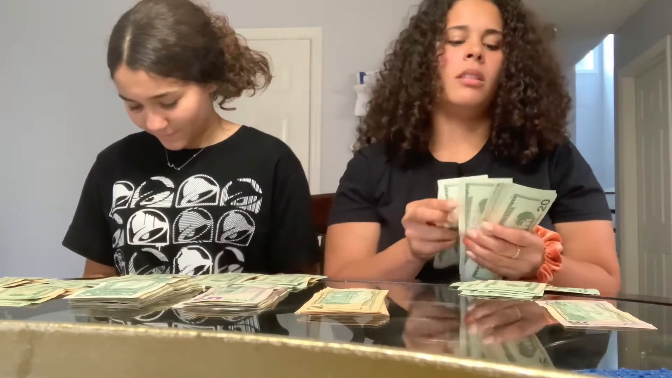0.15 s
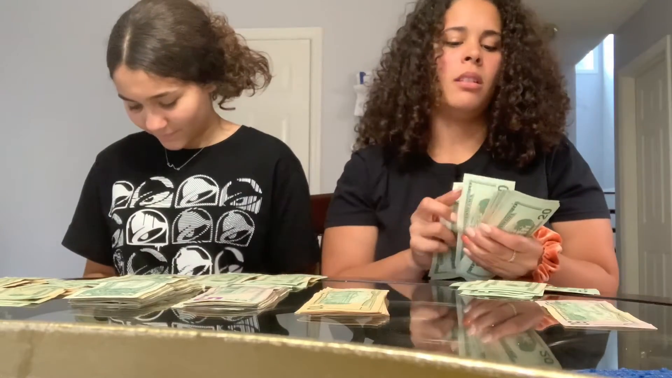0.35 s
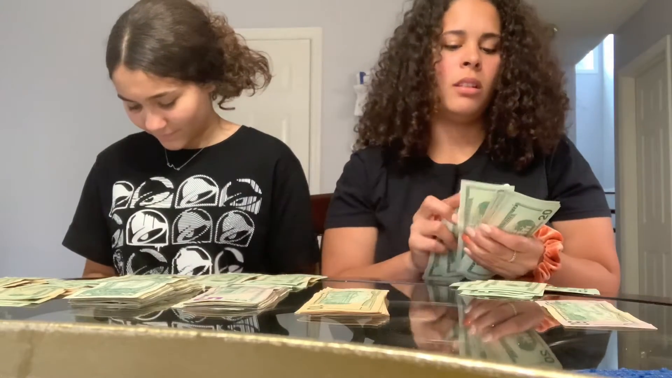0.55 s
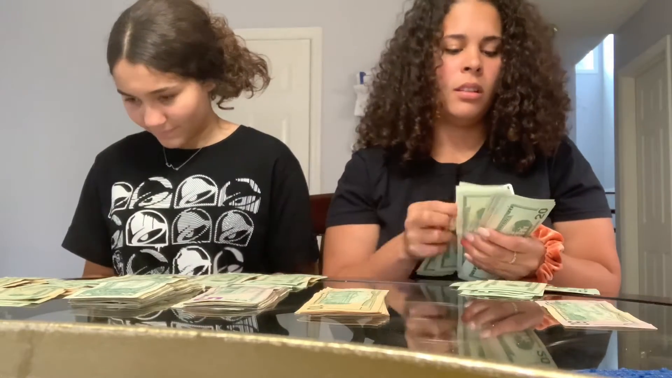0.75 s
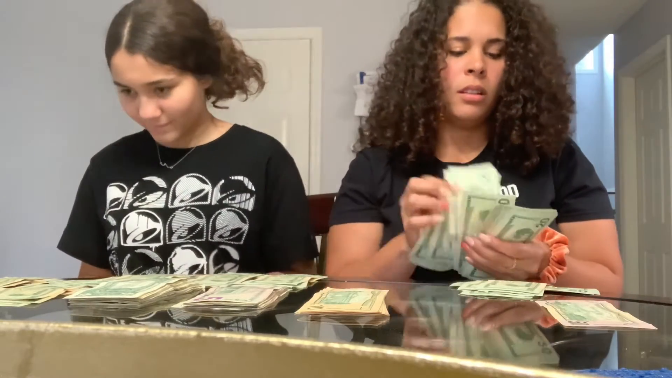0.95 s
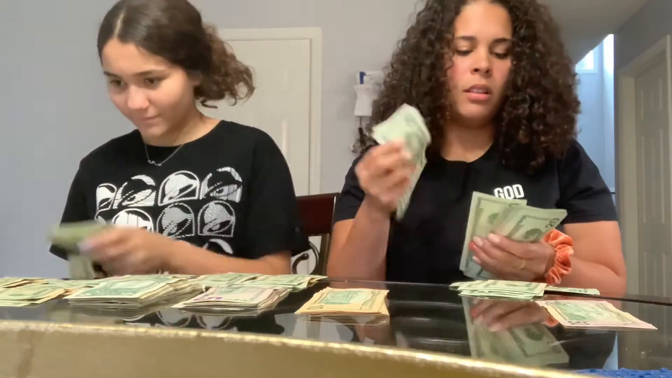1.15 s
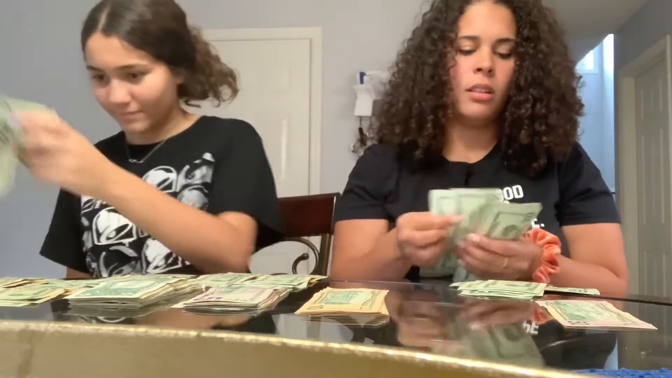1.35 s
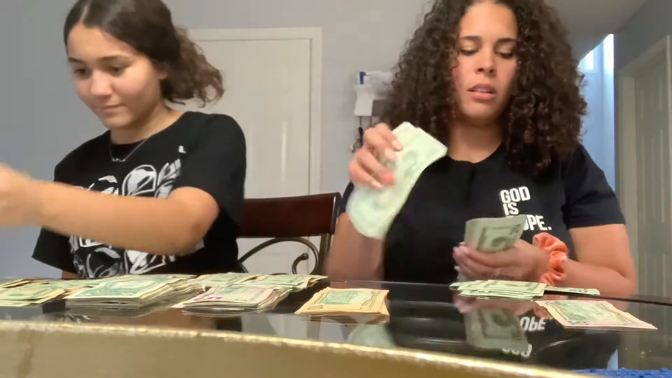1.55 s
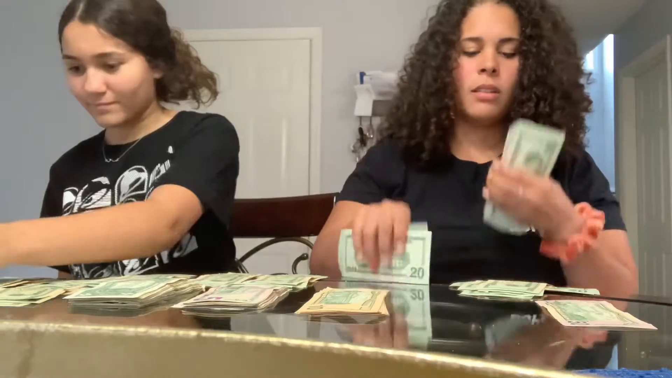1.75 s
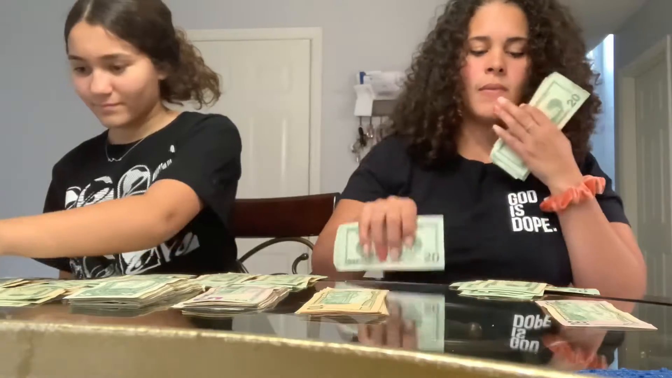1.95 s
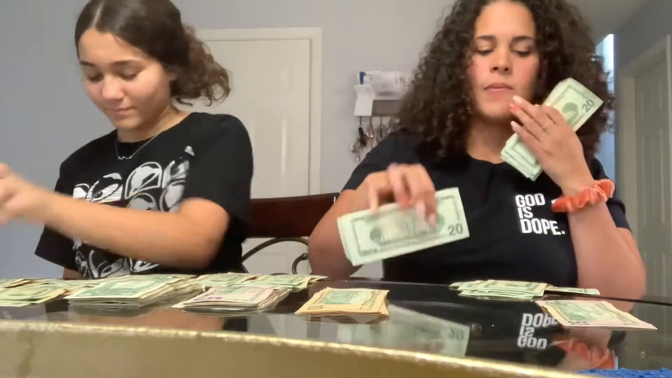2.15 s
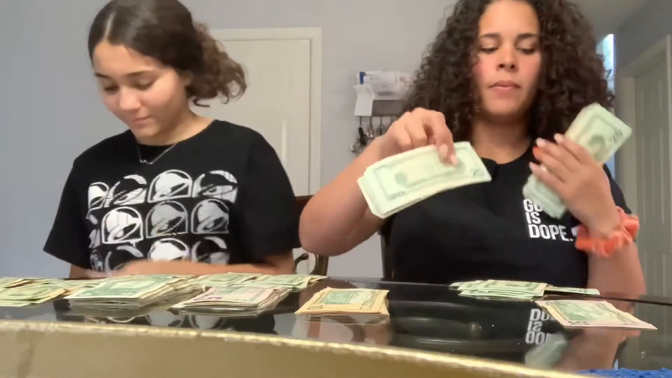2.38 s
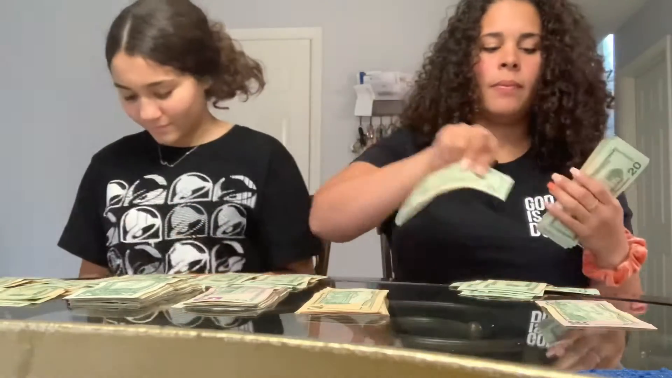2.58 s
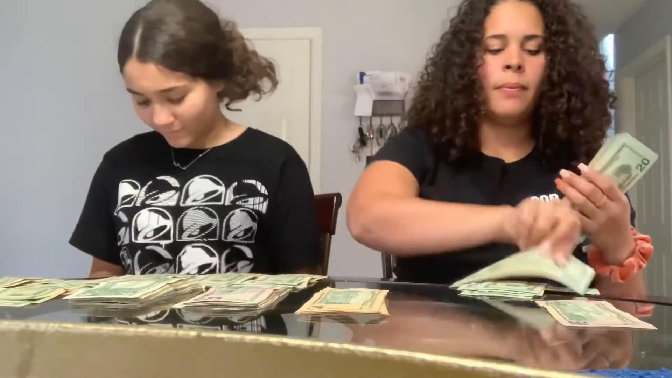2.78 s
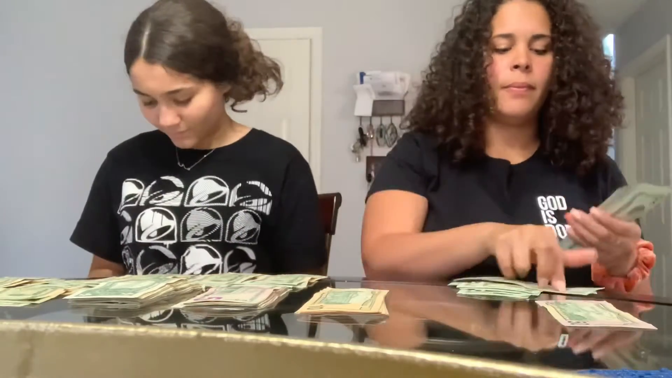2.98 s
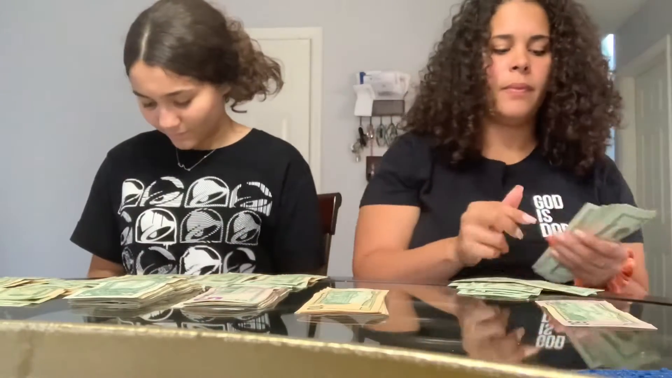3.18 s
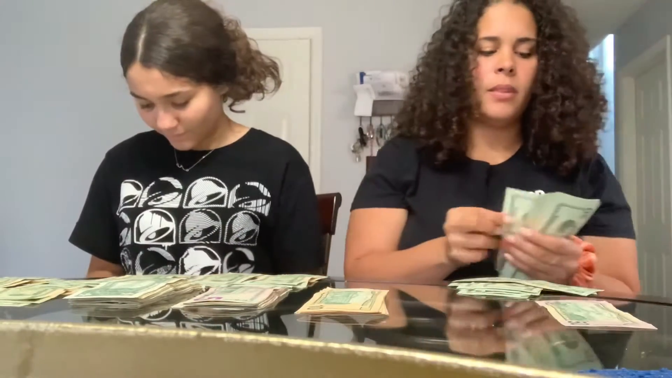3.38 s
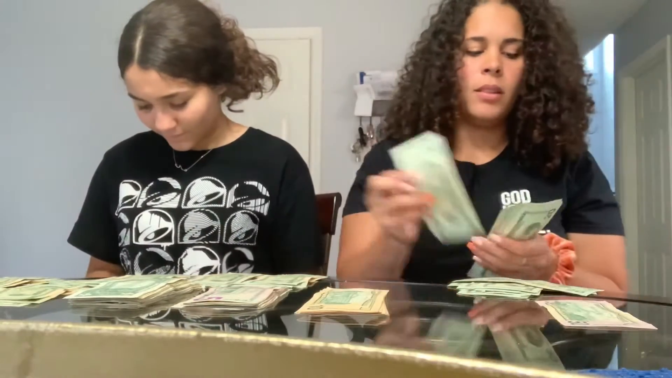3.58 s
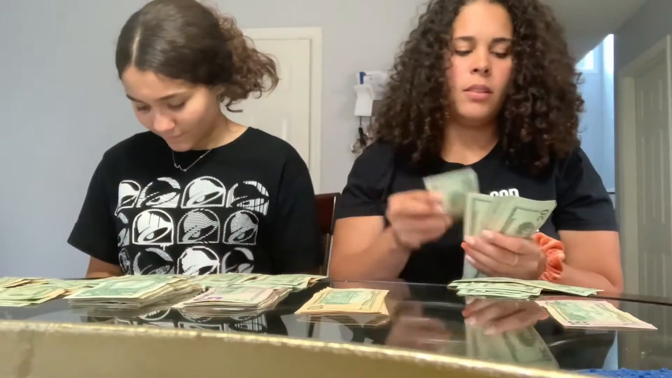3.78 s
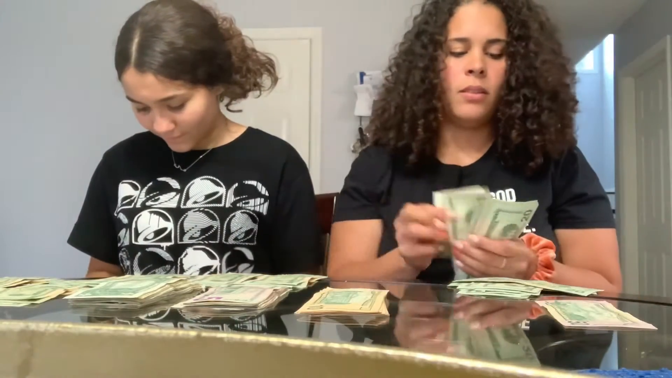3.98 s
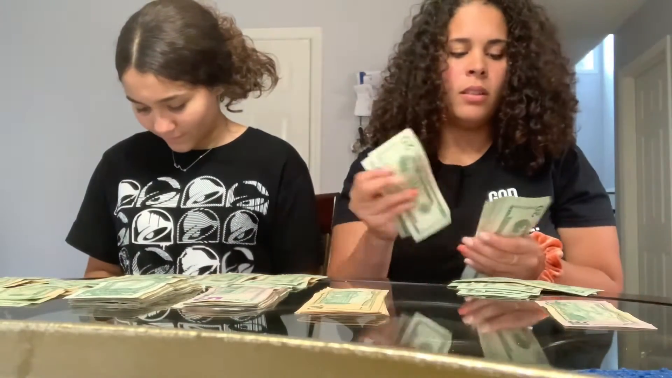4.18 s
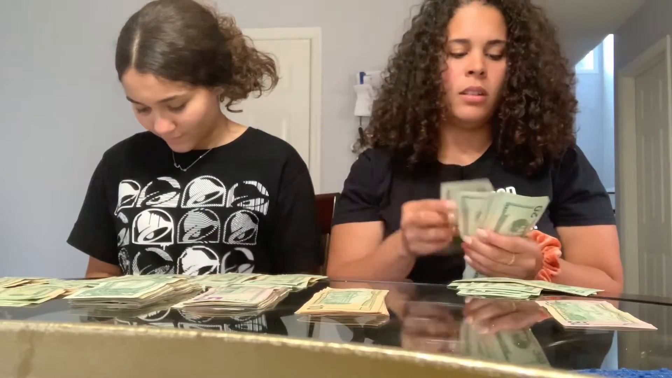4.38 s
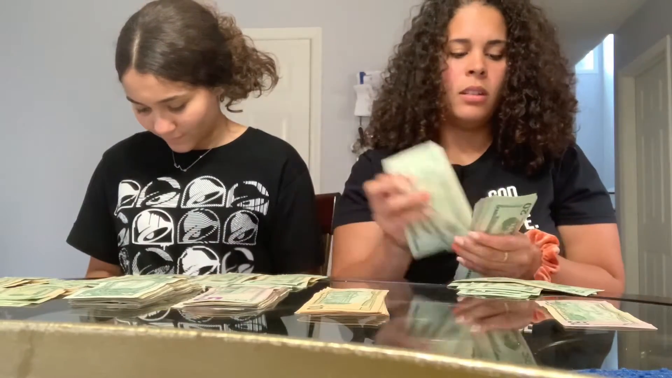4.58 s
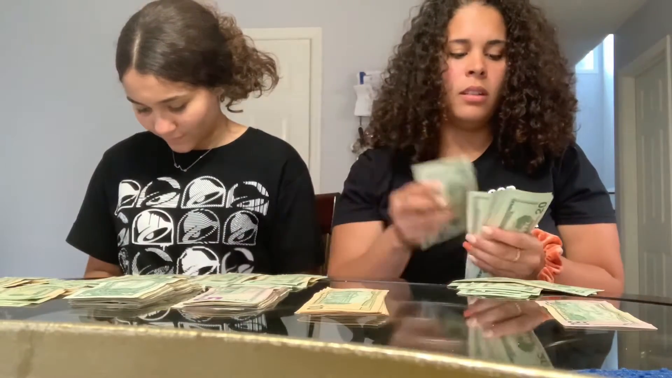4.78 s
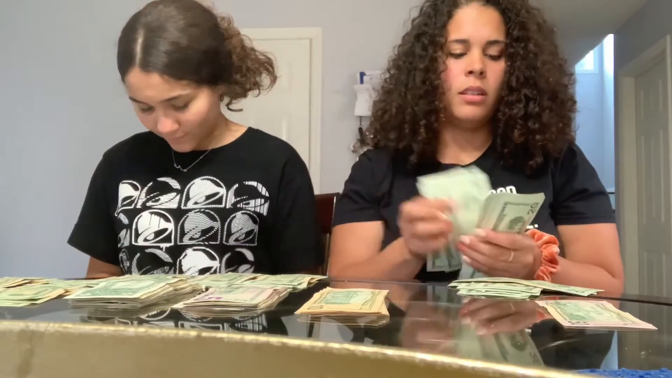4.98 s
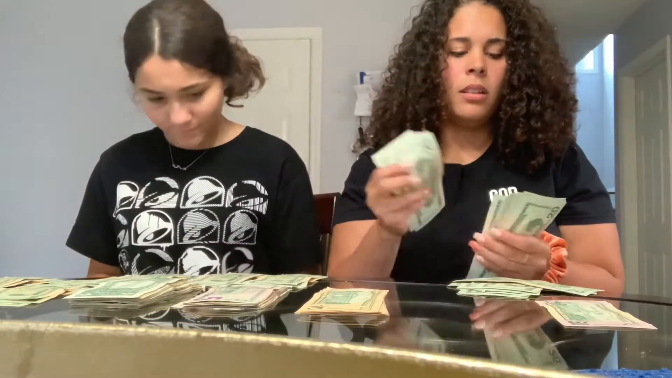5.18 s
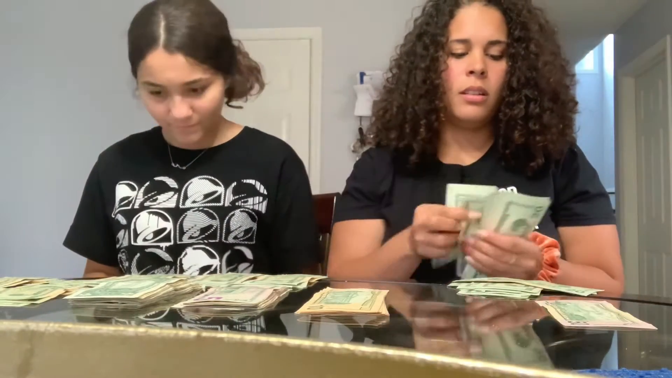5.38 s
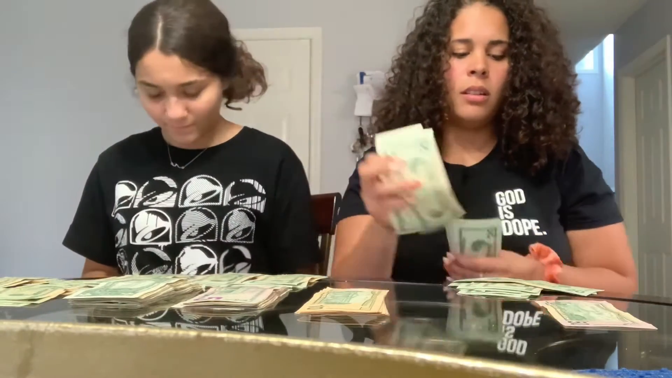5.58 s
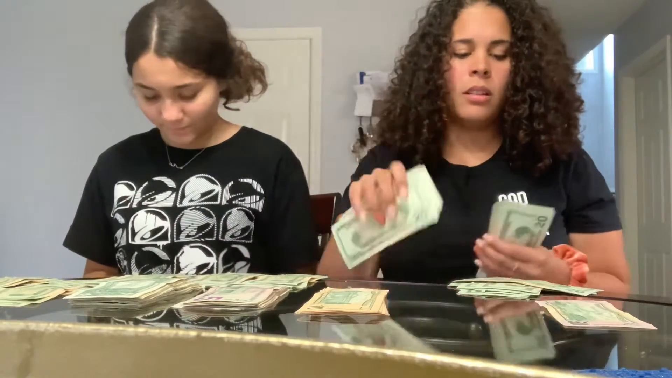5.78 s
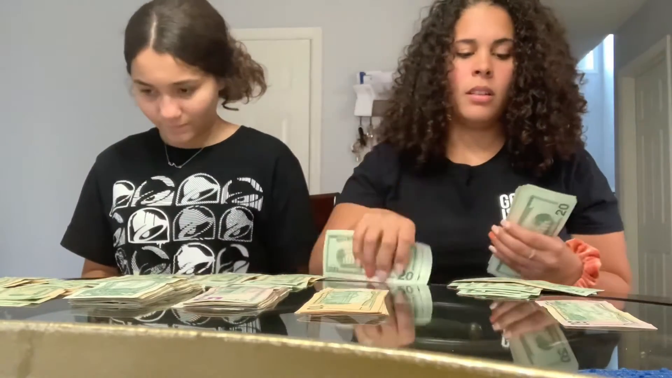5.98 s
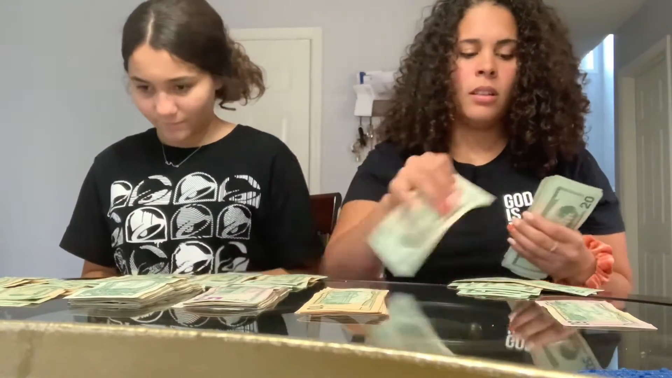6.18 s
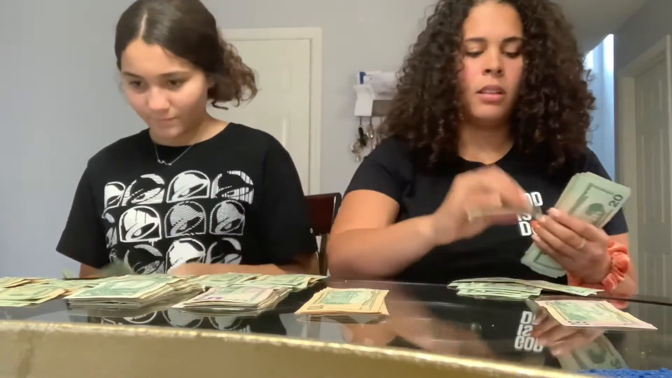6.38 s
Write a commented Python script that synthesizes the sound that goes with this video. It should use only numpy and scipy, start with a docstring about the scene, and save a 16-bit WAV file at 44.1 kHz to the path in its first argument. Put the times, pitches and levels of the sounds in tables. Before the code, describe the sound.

Paper banknotes rustle, flick and snap as they are counted by hand indoors, with a few soft knocks on a glass table.

```python
"""A hard-walled room with a glass table, where paper banknotes are counted by hand.
Notes hiss as they slide over each other, crinkle as creases buckle, flap in the air and snap with a
short ring. A stack is tapped on the table: the glass drums and knocks, and shudders under a leaning arm.
The hands are heard up close in stereo, with the room's echo and a faint hum of the house."""
import sys
import numpy as np
from scipy import signal
from scipy.fft import rfft, irfft, next_fast_len
from scipy.io import wavfile

SR = 44100
rng = np.random.default_rng(int(sys.argv[2]) if len(sys.argv) > 2 else 0)


def log_audio(samples):
    """Write samples as a 16-bit WAV file to the path given in sys.argv[1]."""
    # one column per channel
    frames = np.atleast_2d(samples).T
    # limit to full scale, then quantise
    limited = np.clip(frames, -1, 1)
    pcm = np.round(limited * 32767).astype(np.int16)
    wavfile.write(sys.argv[1], SR, pcm)


N = 284004
FFT_SIZE = next_fast_len(N + SR)
BIN_HZ = np.maximum(np.fft.rfftfreq(FFT_SIZE, 1 / SR), 1)
CONTROL_S = np.arange(0, N, 16) / SR   # envelopes run on this coarse clock


def amp(db):
    """Decibels to gain."""
    return 10 ** (np.asarray(db) / 20)


def rms_one(x):
    """Scale to an rms of 1."""
    return x / np.sqrt(np.mean(x ** 2) + 1e-20)


def peak_one(x):
    """Scale to a peak of 1."""
    return x / np.abs(x).max()


def high_pass(x, hz):
    """Roll off the lows."""
    return signal.sosfilt(signal.butter(2, hz, "high", fs=SR, output="sos"), x)


def low_pass(x, hz, order=2):
    """Roll off the highs."""
    return signal.sosfilt(signal.butter(order, hz, fs=SR, output="sos"), x)


def at_hz(rows, hz, column=1):
    """Read a table on a log-frequency axis."""
    rows = np.array(rows)
    return np.interp(np.log(hz), np.log(rows[:, 0]), rows[:, column])


def colour(x, spectrum):
    """Shape noise with an EQ curve; rms 1."""
    shaped = rfft(x, FFT_SIZE) * amp(at_hz(spectrum, BIN_HZ))
    return rms_one(irfft(shaped, FFT_SIZE)[..., :N])


def drift(rate_hz):
    """Smooth random modulation; rms 1."""
    pole = np.exp(-2 * np.pi * rate_hz / SR)
    wander = signal.lfilter([1], [1, -2 * pole, pole * pole], rng.standard_normal(N + SR // 4))
    return rms_one(wander[SR // 4:])


def ring(x, hz, t60):
    """A resonator: each click sets a dying sine ringing."""
    r, w = amp(-60 / (t60 * SR)), 2 * np.pi * hz / SR
    return signal.lfilter([0, np.sin(w)], [1, -2 * r * np.cos(w), r * r], x + 1e-18)


def ring_twice(x, hz, t60):
    """Two like resonators in series: a softer attack and steeper skirts."""
    return ring(ring(x, hz, t60), hz, t60)


def swells(full_at_s, rise_s, hold_s, fall_db_per_s, speed_power=3.6):
    """One envelope per move: it grows as a power of the speed, holds at 1 and falls away."""
    age = CONTROL_S - np.reshape(full_at_s, (-1, 1))
    rise, hold = np.reshape(rise_s, (-1, 1)), np.reshape(hold_s, (-1, 1))
    speed = np.clip(1 + age / np.maximum(rise, 1e-3), 0, 1)
    return speed ** speed_power * amp(-fall_db_per_s * np.maximum(age - hold, 0))


def audio_rate(envelope):
    """Stretch a coarse envelope to one value per sample."""
    return np.interp(np.arange(N) / SR, CONTROL_S, envelope)


def house(air_db=-70, hum_db=-70.5):
    """Room tone: distant air and appliance noise with a wavering mains hum."""
    # EQ of the air and appliances: (frequency [Hz], relative level [dB])
    air_eq = [(25, -15), (50, 11.5), (120, -3), (200, 1), (500, -4.5), (1500, -18.5), (4000, -11.5),
              (8000, -42.5), (16000, -96.5)]
    hum = rms_one(ring(rng.standard_normal(N), hz=123.6, t60=0.21))
    air = colour(rng.standard_normal((2, N)), air_eq)
    return amp(air_db) * air + amp(hum_db) * hum * [[1], [0]]


def hands(grip_rise_s=0.004, settle_db=-13.5, fidget_hiss_db=-12):
    """The fingers' moves add up in power to three level curves in dB: crinkle, hiss and flap."""
    # restless fingers between the moves: (time [s], crinkle [dB], flap [dB])
    fidgets = [(0, -66.5, -65.5), (.45, -70.5, -67), (.8, -60.5, -67), (1.1, -56.5, -66), (1.25, -106, -71),
               (1.65, -67.5, -74), (2.3, -76, -77), (2.548, -62.5, -63), (2.97, -70.5, -61),
               (3.25, -63, -69.5), (3.7, -62.5, -64), (4.3, -58.5, -63.5), (4.7, -61, -56),
               (5.25, -61.5, -65), (5.752, -76, -85), (5.88, -72, -75), (6.2, -80.5, -71),
               (6.44, -68, -78.5)]
    # fingers grip, bend or drop the notes: (time [s], hold [s], crinkle [dB], flap [dB])
    grips = [(0.197, 0.034, -57.5, -61), (0.496, 0.11, -52.5, -66), (0.643, 0.0076, -50, -45.5),
             (1.001, 0.04, -69, -54), (1.278, 0.15, -46, -51.5), (1.718, 0.039, -32, -43),
             (1.743, 0.051, -44, -40), (1.968, 0.019, -37.5, -46.5), (2.638, 0.11, -55, -57),
             (3.035, 0.0058, -54.5, -81), (3.345, 0.059, -52, -50), (3.475, 0.081, -70, -49.5),
             (3.842, 0.061, -53, -57), (3.927, 0.099, -49, -50.5), (4.08, 0.027, -49.5, -48.5),
             (4.382, 0.18, -53, -48), (4.718, 0.056, -55.5, -71), (5.329, 0.032, -50.5, -50),
             (5.503, 0.027, -48.5, -44.5), (5.903, 0.018, -34.5, -68), (5.925, 0.012, -56, -37)]
    # a note is drawn off the bundle or along the glass:
    # (time at full speed [s], rise [s], hold [s], hiss [dB], crinkle [dB])
    slides = [(.62, 0.057, 0.0038, -57.5, -77), (0.973, 0.3, 0.029, -45.5, -57.5),
              (1.405, 0.29, 0.02, -56.5, -45), (1.72, 0.057, 0.014, -47, -38.5),
              (2.68, 0.23, 0.052, -64, -60), (2.878, 0.68, 0.0047, -68, -58.5),
              (3.479, 0.12, 0.014, -49, -40.5), (4.049, 0.22, 0.005, -45.5, -56),
              (4.5, 0.12, 0.064, -47.5, -48), (5.005, 0.26, 0.037, -49.5, -49),
              (5.454, 0.18, 0.021, -39.5, -37), (5.898, 0.0085, 0.019, -47, -40.5)]
    fidget_s, *fidget_db = np.transpose(fidgets)
    grip_s, grip_hold_s, crush_db, flap_db = np.transpose(grips)
    slide_s, rise_s, slide_hold_s, hiss_db, drag_db = np.transpose(slides)
    idle_crinkle, idle_flap = [amp(np.interp(CONTROL_S, fidget_s, db)) ** 2 for db in fidget_db]
    gripping = swells(grip_s, grip_rise_s, grip_hold_s, fall_db_per_s=319.5) ** 2
    # the sheets go on settling after a grip
    settling = (amp(settle_db) * swells(grip_s, grip_rise_s, grip_hold_s, fall_db_per_s=84.5)) ** 2
    flapping = swells(grip_s, grip_rise_s, grip_hold_s, fall_db_per_s=393.5) ** 2
    sliding = swells(slide_s, rise_s, slide_hold_s, fall_db_per_s=340.5) ** 2
    crushing = amp(crush_db) ** 2 @ (gripping + settling)
    crinkle_power = amp(drag_db) ** 2 @ sliding + crushing + idle_crinkle
    hiss_power = amp(hiss_db) ** 2 @ sliding + amp(fidget_hiss_db) ** 2 * idle_crinkle
    flap_power = amp(flap_db) ** 2 @ flapping + idle_flap
    return [audio_rate(10 * np.log10(power)) for power in (crinkle_power, hiss_power, flap_power)]


def crinkle(level_db, base_clicks_per_s=910, spread_db=2.5, clump_db=7.5):
    """Creases buckle in clumps: uneven clicks over a bed of fibre noise."""
    # EQ of buckling paper: (frequency [Hz], relative level [dB])
    crease_eq = [(300, -17), (750, -6.5), (1050, 0.5), (1350, -0.5), (1650, -3), (2200, -5.5), (3000, -3.5),
                 (4500, -11.5), (7000, -21), (12000, -31)]
    buckles = rng.random((2, N)) < base_clicks_per_s * amp(clump_db * drift(rate_hz=30)) / SR
    sizes = amp(spread_db * np.minimum(rng.exponential(1, (2, N)), 5))
    clicks = rms_one(buckles * sizes * rng.choice([-1, 1], (2, N)))
    fibres = 0.41 * rng.standard_normal((2, N))
    return amp(level_db) * colour(clicks + fibres, crease_eq)


def slide_hiss(level_db, flutter_db=2.5):
    """Paper rubs on paper: a bright hiss with a fluttering level."""
    # EQ of the friction: (frequency [Hz], relative level [dB])
    friction_eq = [(800, -7), (1650, 9.5), (3000, 8), (4550, 11.5), (5050, 3.5), (5750, 7.5), (7000, 3),
                   (9000, 2), (16000, 2.5)]
    gain = amp(level_db + flutter_db * drift(rate_hz=70))
    return gain * colour(rng.standard_normal((2, N)), friction_eq)


def flap(level_db, flutter_db=2.5):
    """Paper moves through air: a fluttering low-mid rush."""
    # EQ of the stirred air: (frequency [Hz], relative level [dB])
    flap_eq = [(60, -16.5), (200, -5), (320, 2.5), (420, 2), (550, 5.5), (700, -0.5), (1500, -35)]
    gain = amp(level_db + flutter_db * drift(rate_hz=110))
    return gain * colour(rng.standard_normal((2, N)), flap_eq)


def snaps(crackle_t60=0.016, crack_t60=0.006, bend_share=0.03, low_cut_hz=263):
    """A dying crackle rings the note's modes; a bright crack and a thud of air come with it."""
    # notes snap: (time [s], level [dB], then against the low modes: rasp [dB], crack [dB], thud [dB])
    events = [(0.508, -48.5, 15, -9, -32), (0.566, -52, 8, -39, 10), (0.652, -39, 9.5, -35, -32),
              (0.764, -42.5, -0.5, -29, -3.5), (1.014, -34, -5, -7, -27), (1.275, -25.5, -8.5, -9.5, -8),
              (1.405, -26, -18, -10, -28), (1.716, -13, 0, 5.5, -47), (1.742, -29, -18, -10, -19),
              (1.971, -20.5, 3.5, -6, -8), (2.394, -45, -30.5, 7.5, -1.5), (2.78, -56.5, 11.5, 21.5, -26),
              (3.372, -33.5, -8, -30, -10), (3.398, -29.5, -32, -35, -12), (3.405, -34, -25, -35, -20),
              (3.436, -34.5, -4, -30, -33), (3.478, -21, -3, -30, -11), (3.492, -29, 1.5, -28, -2.5),
              (3.666, -32.5, -55, -33, -10), (3.87, -29.5, -4, -50, -44), (3.932, -26.5, 0.5, 9.5, -5.5),
              (3.971, -29, -10, -20, -18), (3.977, -17.5, -11, -7.5, -2.5), (3.997, -35, -15, -25, 2),
              (4.378, -34, -9, -20, -20), (4.387, -32.5, -1, 2.5, -24), (4.421, -48, -20, -35, 8),
              (4.428, -28.5, -32, -32, -20), (4.439, -28, -25, -32, -13), (4.494, -24.5, -2.5, -29, -28),
              (4.506, -20.5, -9, -32, -21), (4.59, -32, -20, -35, 7), (4.599, -37.5, -10, -35, 5),
              (4.757, -36, -14, -31, -4), (4.847, -35, -6, -30, -27), (4.858, -22.5, -19, -25, -7.5),
              (4.892, -32, -23, -37, -2), (4.946, -38.5, 4, -29, -27), (5.011, -30, -13, -30, -8.5),
              (5.332, -37.5, -6, -3, 3.5), (5.356, -28.5, -9, -13, -11), (5.378, -36, -18, -30, -8),
              (5.393, -33.5, -5, -28, -2), (5.418, -45, -20, -30, 14), (5.487, -30.5, 4.5, 8, -10),
              (5.9, -30.5, 7, -15, -3), (5.913, -23, -6, -30, -29), (5.936, -25.5, -4, -28, 2),
              (6.066, -41.5, 6, -7, -25)]
    # low modes, the body of a note: (frequency [Hz], relative level [dB], t60 [s])
    body_modes = [(1100, -2, 0.033), (1300, 7, 0.018), (1583, 6.5, 0.0097), (2250, -12.5, 0.03)]
    # high modes, its rasp: (frequency [Hz], relative level [dB], t60 [s])
    rasp_modes = [(2850, -1, 0.005), (3600, 1, 0.009), (4600, -5, 0.005)]
    modes, length = body_modes + rasp_modes, 2048
    out, age = np.zeros((2, N + length)), np.arange(length) / SR
    noises = rng.standard_normal((len(events), 3, 2, length))
    accents_db = rng.normal(0, 0.94, (len(events), len(modes)))
    detunes = 1 + bend_share * rng.standard_normal(accents_db.shape)   # each bend shifts each mode
    for event, noise, accent_db, detune in zip(events, noises, accents_db, detunes):
        time_s, level_db, rasp_db, crack_db, thud_db = event
        crackle, puff = low_pass(noise[:2] * amp(-60 * age / crackle_t60), hz=4500)
        rings = [amp(db + extra_db) * ring(crackle, hz * shift, t60)
                 for (hz, db, t60), extra_db, shift in zip(modes, accent_db, detune)]
        # a small sheet radiates little below its modes
        body = peak_one(high_pass(sum(rings[:len(body_modes)]), hz=900))
        rasp = amp(rasp_db) * peak_one(sum(rings[len(body_modes):]))
        crack = amp(crack_db) * peak_one(high_pass(noise[2] * amp(-60 * age / crack_t60), hz=6400))
        thud = amp(thud_db) * peak_one(ring_twice(puff, hz=464, t60=0.0081))
        start = round(time_s * SR)
        out[:, start:start + length] += amp(level_db) * (body + rasp + crack + thud)
    return high_pass(high_pass(out[:, :N], low_cut_hz), low_cut_hz)


def stack_taps():
    """The squared stack lands on its edge; the glass under it drums low and faintly sings."""
    # landings: (time [s], hold [s], drum [dB], singing [dB])
    landings = [(1.747, 0.022, -41, -64), (1.977, 0.049, -50.5, -49.5), (5.924, 0.016, -43, -65)]
    time_s, hold_s, drum_db, sing_db = np.transpose(landings)
    envelopes = swells(time_s, rise_s=0.0071, hold_s=hold_s, fall_db_per_s=137)
    drum = rms_one(ring_twice(rng.standard_normal(N), hz=418, t60=0.013))
    sing = rms_one(ring_twice(rng.standard_normal(N), hz=3700, t60=0.012))
    return audio_rate(amp(drum_db) @ envelopes) * drum + audio_rate(amp(sing_db) @ envelopes) * sing


def table_knocks(softness_hz=900, shiver_s=0.079):
    """A soft, uneven blow sets the table's modes ringing, each with a strength of its own."""
    # stack and hand meet the table: (time [s], level [dB])
    blows = [(1.773, -51), (1.981, -42.5), (5.939, -30.5)]
    # modes of the table: (frequency [Hz], relative level [dB], t60 [s])
    modes = [(91.5, -14, 0.51), (130, -11, 0.092), (161, -7.5, 0.11), (260, -4.5, 0.093), (382, -11, 0.097)]
    time_s, blow_db = np.transpose(blows)
    accents_db = rng.normal(0, 0.9, (len(blows), len(modes)))
    age = np.arange(N // 16) / SR
    shiver = 0.023 * np.exp(-age / shiver_s) * rng.standard_normal(len(age))
    shiver[0] = 1   # the blow itself; the top keeps shivering after it
    ringing = np.zeros(N)
    for (hz, mode_db, t60), accent_db in zip(modes, accents_db.T):
        clicks = np.zeros(N)
        clicks[(time_s * SR).astype(int)] = amp(blow_db + mode_db + accent_db)
        ringing += ring(clicks, hz, t60)
    return low_pass(signal.fftconvolve(ringing, shiver)[:N], softness_hz)


def table_shudder(lump_db=1.1):
    """Under a leaning arm the glass and its frame give a lumpy rumble."""
    # the arm leans on the top: (time [s], hold [s], level [dB])
    leans = [(1.801, 0.34, -56), (2.82, 0.22, -64)]
    # EQ of glass and frame: (frequency [Hz], relative level [dB])
    rumble_eq = [(20, -22), (40, 11.5), (70, -5.5), (150, -5), (380, -10.5), (600, -49)]
    time_s, hold_s, level_db = np.transpose(leans)
    gain = amp(level_db) @ swells(time_s, rise_s=0.05, hold_s=hold_s, fall_db_per_s=111.5)
    rumble = amp(lump_db * drift(rate_hz=9.6)) * colour(rng.standard_normal(N), rumble_eq)
    return audio_rate(gain) * rumble


def glass_reflection(x, lag_s=0.00097, wander_share=0.012, echo_db=-5):
    """A slightly dull echo off the table top combs the sound; its lag wanders as the hands move."""
    now = np.arange(N)
    then = now - SR * lag_s * (1 + wander_share * drift(rate_hz=9.8))
    dull = low_pass(high_pass(x, hz=1200), hz=9000, order=1)
    echo = np.array([np.interp(then, now, side) for side in dull])
    return x - amp(echo_db) * echo   # the glass mirrors the back of the sheet, opposite in polarity


def room_reverb(x, gain_db=4.5, build_s=0.002):
    """Echoes off the hard walls build up fast and die away in half-octave bands."""
    # decay of the room: (frequency [Hz], t60 [s])
    decay_times = [(100, 0.94), (300, 0.57), (700, 0.45), (1840, 0.45), (4850, 0.46), (12800, 0.28)]
    age, tail = np.arange(SR) / SR, 0
    edges_hz = 40 * 2 ** np.arange(0, 9.1, 0.5)
    white = rng.standard_normal((2, len(age)))
    for low, high in zip(edges_hz, edges_hz[1:]):
        t60 = at_hz(decay_times, np.sqrt(low * high))
        envelope = amp(-60 * age / t60) * (1 - np.exp(-(age / build_s) ** 2))
        band = signal.sosfilt(signal.butter(2, [low, high], "band", fs=SR, output="sos"), white)
        tail = tail + band * envelope / np.sqrt(np.sum(envelope ** 2))
    return amp(gain_db) * irfft(rfft(x, FFT_SIZE) * rfft(tail, FFT_SIZE), FFT_SIZE)[:, :N]


def stereo_image(pair, diffuse):
    """Two unrelated signals, as mid and side, become left and right, almost opposite at 8-10 kHz."""
    # stereo image by frequency: (frequency [Hz], right's phase lead [rad], direct coherence [0-1],
    # diffuse coherence [0-1], left minus right [dB])
    image = [(60, 0, .7, .65, -2), (350, .7, .9, .75, 0), (730, 1.9, .55, .15, -5), (1100, .9, .7, .3, -6),
             (1600, .7, .85, .3, -1), (2100, 1.3, .8, .3, -1), (3300, 3.0, .6, .2, -2),
             (6600, 6.6, .5, .2, 0), (8350, 9.42, .97, .97, 0), (9900, 9.42, .995, .995, 0),
             (11000, 8.0, .7, .5, 0), (12600, 6.7, .85, .8, 0), (13600, 6.28, .99, .99, 0)]
    mid, side = rfft(pair, FFT_SIZE)
    coherence = np.clip(at_hz(image, BIN_HZ, column=3 if diffuse else 2), 0, 1)
    mid, side = np.sqrt((1 + coherence) / 2) * mid, np.sqrt((1 - coherence) / 2) * side
    lead_rad, balance_db = at_hz(image, BIN_HZ), at_hz(image, BIN_HZ, column=4)
    pan = np.exp(0.5j * lead_rad) / amp(balance_db / 2)
    return irfft(np.array([(mid + side) / pan, (mid - side) * pan]), FFT_SIZE)[:, :N]


def scene(puff_hz=800):
    """Paper and table, heard up close and through the room, over the hum of the house."""
    crinkle_db, hiss_db, flap_db = hands()
    paper = crinkle(crinkle_db) + slide_hiss(hiss_db) + flap(flap_db) + snaps()
    table = table_knocks() + table_shudder() + stack_taps()
    direct = glass_reflection(paper) + table * [[1], [0]]   # the table feeds the mid only
    # the slower puffs of the sheets stay close and hardly reach the walls
    reverb_send = high_pass(high_pass(paper[0], puff_hz), puff_hz) + table
    ambience = room_reverb(reverb_send) + house()
    return stereo_image(direct, diffuse=False) + stereo_image(ambience, diffuse=True)


def record(dry):
    """The deep bass rolls off and the top is cut steeply."""
    low_cut_hz, high_cut_hz = 40, 15850
    steep_cut = signal.ellip(12, 0.5, 70, high_cut_hz, fs=SR, output="sos")
    return signal.sosfilt(steep_cut, high_pass(dry, low_cut_hz))


dry = scene()
out = record(dry)
log_audio(out)
```